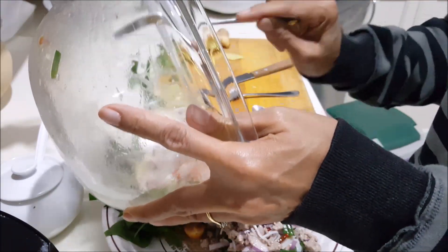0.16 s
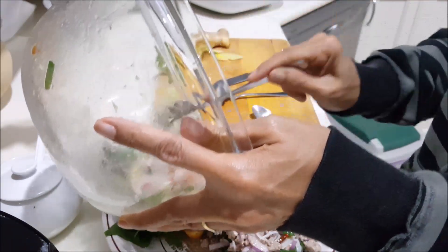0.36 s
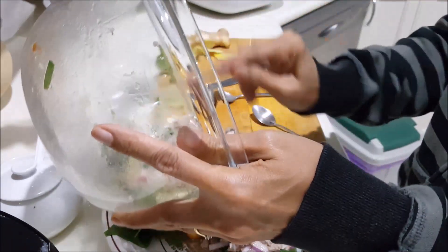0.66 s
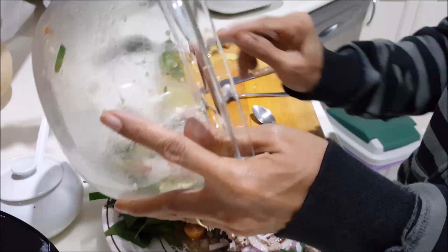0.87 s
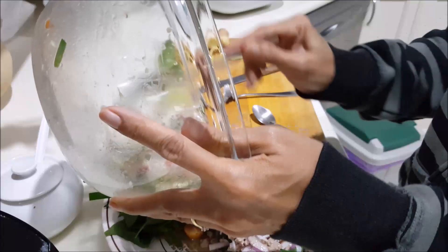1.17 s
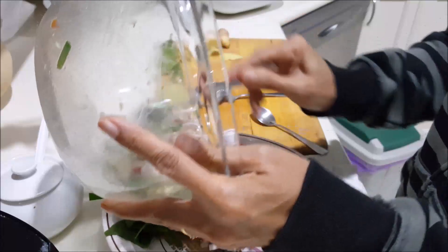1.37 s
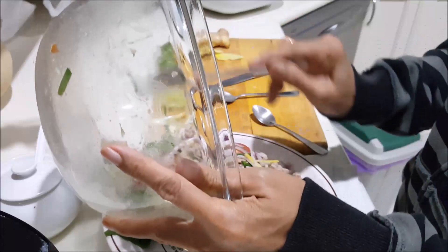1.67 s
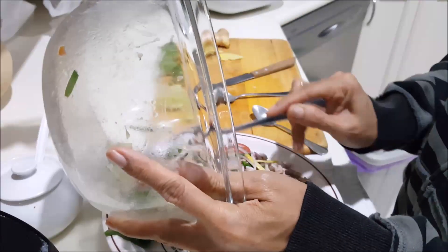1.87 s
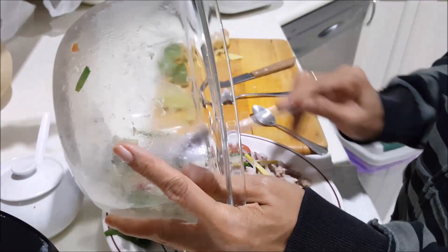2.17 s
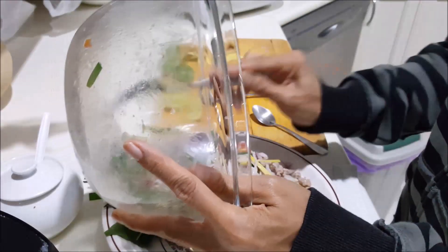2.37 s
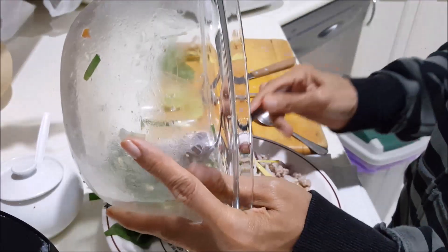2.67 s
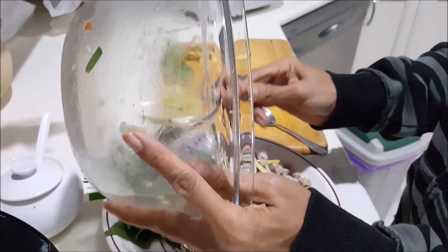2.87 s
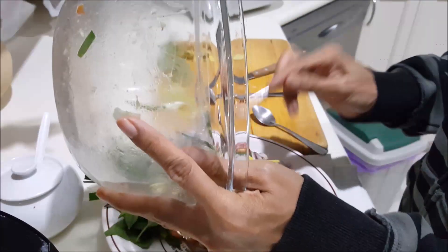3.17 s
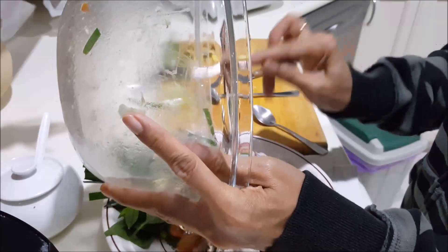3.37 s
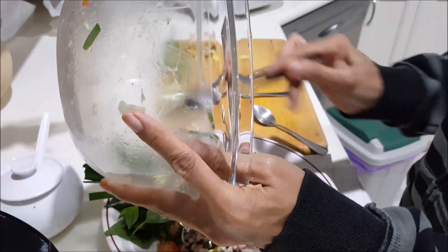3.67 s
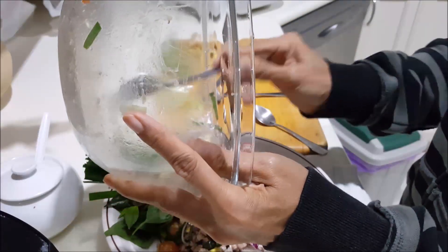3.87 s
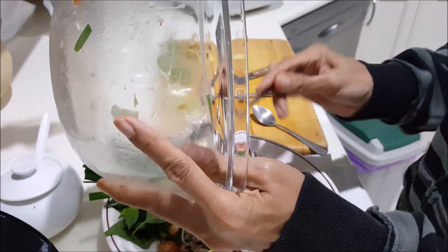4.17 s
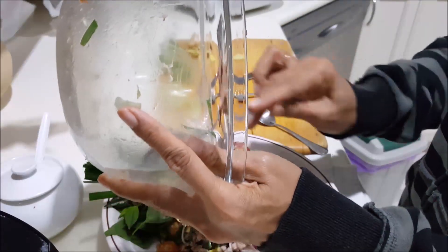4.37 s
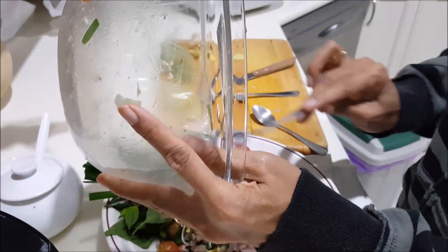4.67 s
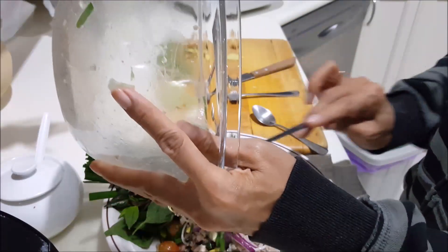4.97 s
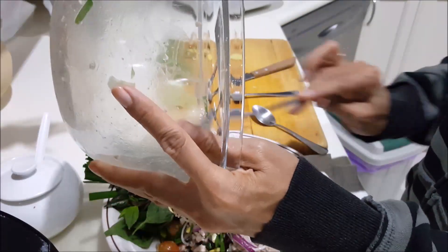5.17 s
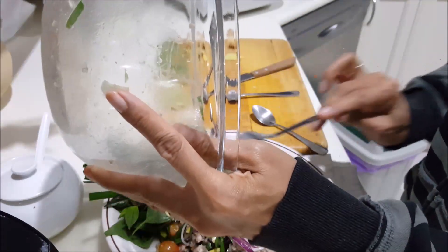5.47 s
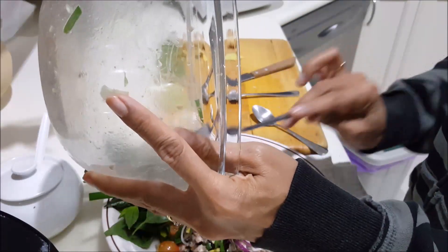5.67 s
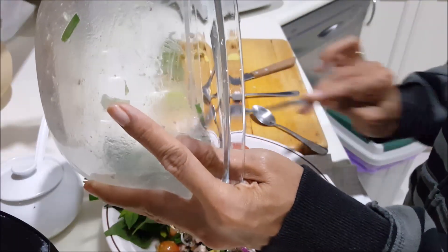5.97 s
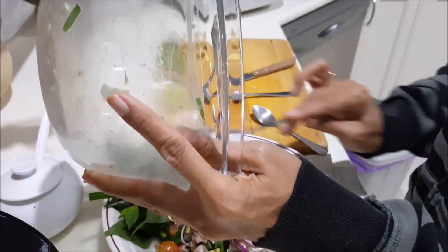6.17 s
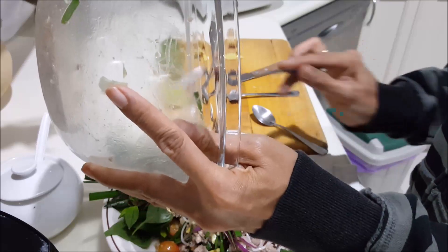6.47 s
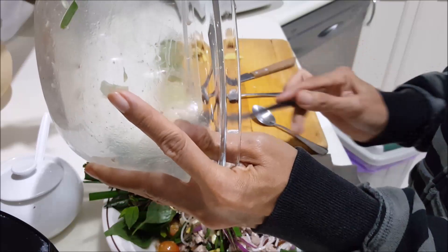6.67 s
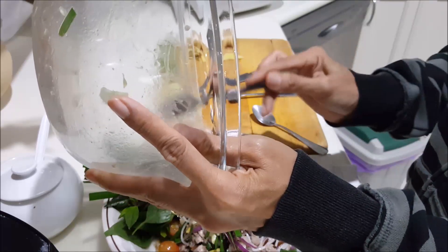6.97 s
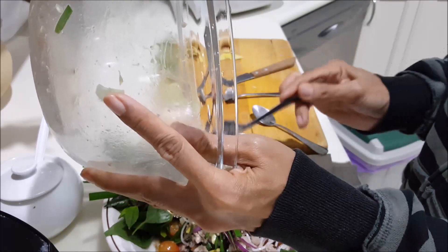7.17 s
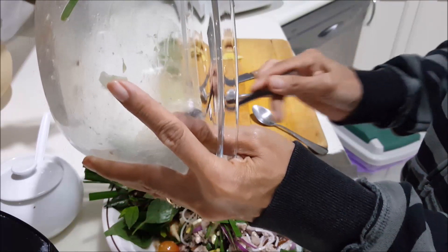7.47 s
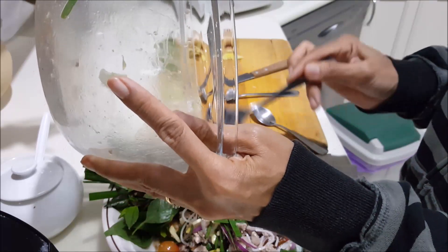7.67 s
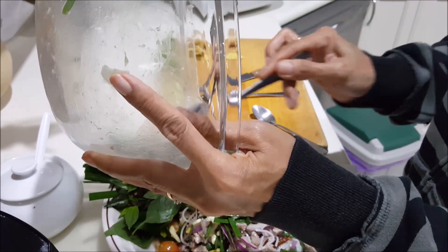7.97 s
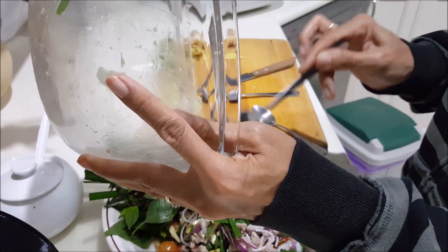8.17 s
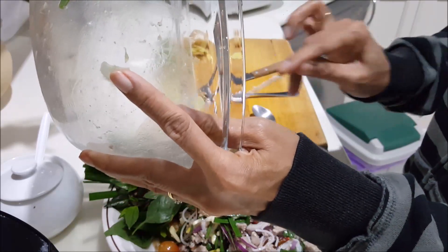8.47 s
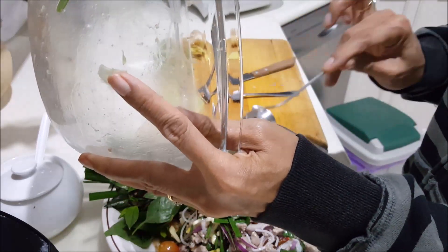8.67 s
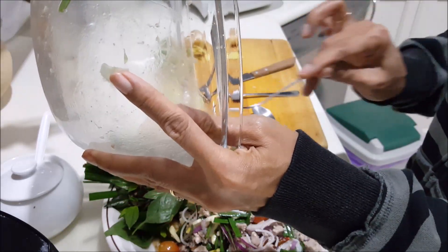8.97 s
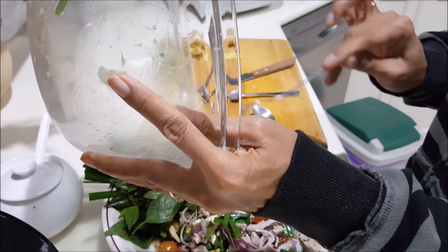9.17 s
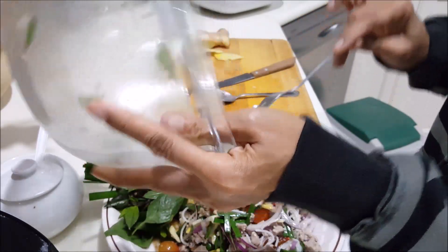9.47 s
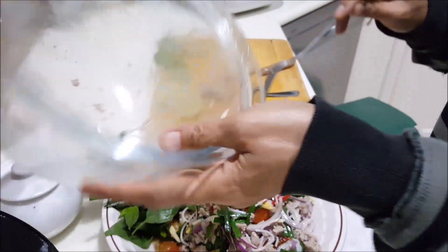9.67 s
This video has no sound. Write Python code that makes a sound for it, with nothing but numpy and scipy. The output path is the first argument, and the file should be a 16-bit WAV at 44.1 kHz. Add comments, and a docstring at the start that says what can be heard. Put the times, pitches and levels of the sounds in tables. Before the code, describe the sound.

Close by, a metal fork works inside a thick glass bowl held in the hand. Light taps alternate with harder, ringing clinks at uneven gaps, the loudest a little after three seconds. Brief skids and thin squeals come around five to six seconds, then a quick cluster of duller knocks, and a tiny squeak near the end. The small kitchen adds a short bright echo over faint hum.

```python
"""In a small kitchen a thick glass bowl is held tilted, close by, while a steel fork clears the last of a salad.
Tines tap and knock the wall: decaying sines for glass and fork, with a noise burst for the contact.
Now and then they skid (runs of tiny slips), squeal (swelling sines) and squeak (uneven harmonics) on the wet glass.
An appliance hums underneath, in dull air noise; the bowl's sounds echo in the room."""
import sys
import numpy as np
from scipy import signal
from scipy.fft import rfft, irfft, next_fast_len
from scipy.io import wavfile
from scipy.ndimage import uniform_filter1d

SR = 44100
rng = np.random.default_rng(int(sys.argv[2]) if len(sys.argv) > 2 else 0)


def pcm_store(signal):
    """Save signal as 16-bit PCM."""
    levels = np.round(np.clip(np.atleast_2d(signal), -1, 1) * 32767)
    wavfile.write(sys.argv[1], SR, levels.astype(np.int16).T)


N = 433503

# centres of the nine families of modes [Hz]
FAMILY_HZ = [470, 1190, 2200, 3500, 4950, 6900, 8500, 11000, 15000]
# a contact's level is its rms over this time
LEVEL_WINDOW_S = 0.05


def from_db(db):
    """Decibels to gain."""
    return np.exp(np.asarray(db) * np.log(10) / 20)


def rms_one(x):
    """Scale to an rms of 1."""
    return x / np.sqrt(np.mean(x ** 2) + 1e-20)


def at_hz(points, hz):
    """Read a spectrum on a log-frequency axis."""
    f, value = np.transpose(points)
    return np.interp(np.log(np.maximum(hz, 1)), np.log(f), value)


def bins(size):
    """Frequencies of a real FFT [Hz]."""
    return np.arange(size // 2 + 1) * SR / size


def drift(rate_hz, size):
    """Smooth random wander with a spread near 1."""
    at = np.arange(size) * rate_hz / SR
    knots = int(at[-1]) + 2
    return np.interp(at, np.arange(knots), rng.standard_normal(knots))


def add(track, start_s, sound):
    """Mix a sound into a track; what falls outside is cut."""
    i = round(start_s * SR)
    track[:, max(i, 0):max(i + sound.shape[-1], 0)] += sound[..., max(-i, 0):N - i]


def room_tone(air_db=-54.0, waver_db=1.0, waver_rad=0.23):
    """Dull steady air noise, less alike in the two ears as pitch rises, and the wavering hum of an appliance."""
    # air noise: (frequency [Hz], relative density [dB per Hz])
    air_spectrum = [(25, -40), (43, -19.5), (55, -10.5), (75, -10.5), (102, -4), (130, -11.5), (285, -14.5),
                    (520, -16), (1100, -24), (2050, -29), (3520, -35.5), (7100, -46), (10000, -48.5),
                    (16000, -44.5)]
    # left-right coherence: (frequency [Hz], likeness [0-1])
    likeness = [(60, 0.94), (250, 0.93), (600, 0.4), (1500, 0.3), (4000, 0.053)]
    # appliance hum: (frequency [Hz], mean level [dB rms])
    hum_partials = [(60, -61.5), (100, -57)]
    size = next_fast_len(N, True)
    hz, t = bins(size), np.arange(N) / SR
    mid, side = rfft(rng.standard_normal((2, size))) * from_db(at_hz(air_spectrum, hz))
    alike = np.clip(at_hz(likeness, hz), 0, 1)
    spectrum = np.sqrt(1 + alike) * mid + np.sqrt(1 - alike) * side * [[1], [-1]]
    air = rms_one(irfft(spectrum, size)[:, :N])
    hum = 0
    for f, db in hum_partials:
        level = np.sqrt(2) * from_db(db + waver_db * drift(2.1, N))
        hum = hum + level * np.sin(2 * np.pi * f * t + waver_rad * drift(21.0, N))
    return from_db(air_db) * air + hum


def kitchen(x, wet_db=-4.5, treble_wet_db=-3.0, first_echo_s=0.011, even_hz=22):
    """Dense echoes from worktop and cupboards, as decaying noise bands; the top treble dies first."""
    # reverberation: (frequency [Hz], t60 [s])
    reverb_t60 = [(300, 0.33), (1200, 0.51), (3000, 0.57), (7000, 0.53), (10000, 0.43), (15000, 0.11)]
    size = 2 ** 15
    t, hz = np.arange(size) / SR, bins(size)
    white, echo = rfft(rng.standard_normal((2, size))), 0
    for k, (_, t60) in enumerate(reverb_t60):
        band = at_hz([(f, j == k) for j, (f, _) in enumerate(reverb_t60)], hz)
        echo = echo + irfft(white * band) * from_db(-60 * t / t60)
    # a diffuse field returns about the same energy at every pitch
    response = rfft(echo)
    width = max(int(even_hz * size / SR), 3)
    response /= np.sqrt(uniform_filter1d(np.abs(response) ** 2, width, axis=-1))
    response *= from_db(wet_db + treble_wet_db * hz / FAMILY_HZ[-1])
    fade_in = np.minimum(t / first_echo_s, 1)
    echo = irfft(response) * fade_in * (t < t[-1] * 3 / 4)
    return signal.fftconvolve(x, echo, axes=-1)[:, :N]


def squeak(brightening=2.2, jitter=0.013, rough=0.35):
    """A tine judders unevenly across wet glass; the harder it presses, the sharper each slip."""
    # stick-slip course: (time [s], slip rate [per s], pressure as level [dB])
    course = [(8.532, 1820, -78), (8.548, 1750, -45), (8.561, 1770, -38), (8.574, 1840, -34),
              (8.58, 1760, -44.5), (8.587, 1900, -39), (8.597, 2100, -47), (8.613, 2300, -54)]
    # harmonics at full pressure: (multiple, relative level [dB])
    harmonics = [(1, -5), (2, -9), (3, -32), (4, -7), (5, -6), (6, -9.5), (7, -4), (8, -5.5)]
    s, slips_per_s, db = np.transpose(course)
    t = np.arange(s[0], s[-1], 1 / SR)
    level_db = np.interp(t, s, db)
    rate = np.interp(t, s, slips_per_s) * (1 + jitter * drift(1450, len(t)))
    phase = 2 * np.pi * np.cumsum(rate) / SR
    sharpness = from_db(brightening * (level_db - db.max()))
    tone = 0
    for k, (multiple, harmonic_db) in enumerate(harmonics):
        # sharpness spares the fundamental
        level = from_db(level_db + harmonic_db) * sharpness ** min(k, 1)
        tone = tone + level * np.sin(round(multiple) * phase)
    out = np.zeros((2, N))
    add(out, s[0], np.sqrt(2) * tone * (1 + rough * drift(900, len(t))))
    return out


def squeals(waver=0.003, glide=0.0013, left_lead_rad=0.99):
    """Stick-slip friction drives one mode, which swells and dies as the fork slides."""
    # squeals: (time at the loudest [s], half length to 1/e [s], pitch [Hz], peak level [dB rms])
    squeal_events = [(5.022, .013, 14160, -32.5), (6.212, .02, 2181, -39.5), (6.226, .024, 8290, -35),
                     (6.228, 0.032, 10670, -44), (6.233, 0.034, 2540, -51.5), (6.249, .014, 4920, -48.5),
                     (6.252, 0.02, 13870, -38), (6.277, 0.011, 2840, -49), (8.144, 0.014, 4180, -51),
                     (8.579, 0.0098, 7070, -36), (8.581, .014, 3460, -44.5)]
    out = np.zeros((2, N))
    for s, half_s, hz, db in squeal_events:
        u = np.linspace(-np.pi, np.pi, int(2 * np.pi * half_s * SR))
        pitch_hz = hz * (1 + glide * u + waver * drift(400, len(u)))
        phase = 2 * np.pi * np.cumsum(pitch_hz) / SR
        tone = np.sin(phase + np.array([[left_lead_rad], [0]]))
        add(out, s - np.pi * half_s, from_db(db) * np.sqrt(2) * np.exp(-u ** 2) * tone)
    return out


def ringing(t, modes, colour, free_s, damped_t60, pressed_t60=0.0066, pressed_db=7.5,
            uneven_db=3.0, phase_spread=0.29, detune=0.0017):
    """Each mode loses its first swing quickly, rings while the fork is off the wall, and is damped when it settles."""
    out = np.zeros((2, len(t)))
    damping = from_db(-60 * np.maximum(t - free_s, 0) / damped_t60)
    first_swing = from_db(pressed_db - 60 * t / pressed_t60)
    for (hz, db, t60, lead), chance in zip(modes, rng.standard_normal((len(modes), 4))):
        decay = damping * from_db(-60 * t / t60) + first_swing
        decay *= np.sqrt(2 * LEVEL_WINDOW_S * SR / np.sum(decay ** 2))
        high = min(hz / FAMILY_HZ[5], 1)      # short waves depend most on the exact spot
        gain = from_db(at_hz(colour, hz) + db + uneven_db * high * chance[0])
        lead = lead + phase_spread * chance[1] * (1 + 8 * high ** 2)
        phase = 2 * np.pi * hz * (1 + detune * chance[2]) * t + np.array([[lead / 2], [-lead / 2]])
        out += np.sign(chance[3]) * gain * decay * np.sin(phase.astype(np.float32))
    return out


def crack(t, colour, t60=0.0065, rattle_t60=0.11, rattle_db=-11, level_db=15.5,
          alike_below_hz=3500, right_lag_s=0.0001):
    """The tines chatter on the glass for some milliseconds: a broad burst with a short dense ring."""
    # dry crack of the contact: (frequency [Hz], density relative to the family level [dB per Hz])
    crack_spectrum = [(120, -20.5), (300, -14), (560, -4), (850, -11), (1700, -10), (2600, -9), (3800, -3),
                      (5600, -16.5), (6500, -8.5), (8700, -0.5), (9800, -29.5), (12500, -20), (16000, -24)]
    hz = bins(len(t))
    lag = np.exp(-2j * np.pi * hz * right_lag_s * np.array([[0], [1]]))
    shared = rfft(rng.standard_normal(len(t))) * lag
    own = rfft(rng.standard_normal((2, len(t))))
    alike = 1 / (1 + (hz / alike_below_hz) ** 2)
    spectrum = np.sqrt(alike) * shared + np.sqrt(1 - alike) * own
    noise = irfft(spectrum * from_db(at_hz(crack_spectrum, hz) + at_hz(colour, hz)), len(t))
    decay = from_db(-60 * t / t60) + from_db(rattle_db - 60 * t / rattle_t60)
    return from_db(level_db) * noise * decay * np.sqrt(LEVEL_WINDOW_S * SR / np.sum(decay ** 2))


def overtones(count=22, low_hz=5800, high_hz=14500, db=-11, t60=0.12):
    """The bowl's many weak high modes, irregularly spaced."""
    places = (np.arange(count) + rng.random(count)) / count
    return [(low_hz + place * (high_hz - low_hz), db, t60, 0) for place in places]


def touch(glass_db, steel_db, free_s, high_modes, crack_db, damped_t60, pressed_db, contact_s=0.00058):
    """One touch of the fork: a crack and the ring of glass and steel, each with a level per family."""
    # glass bowl: (frequency [Hz], level within the family [dB], undamped t60 [s], left ear's mean lead [rad])
    bowl_modes = [(469, 0.5, .2, .4), (1187, -4, .22, .7), (2199, 1.5, .27, 1.7), (3457, -1, .2, 1.0),
                  (4935, -4, .18, 1.0), (6390, -5, .22, -.5), (6568, -7, .22, -.8), (6818, -11, .22, .5),
                  (7020, -13, .25, -.5), (7660, -3, .25, -.8), (8780, -4, .22, -.8), (505, -8, .05, .4),
                  (1235, -8, .12, .8), (2245, -10, .08, 1.6), (2120, -9, .03, 1.6), (3400, -13, .06, 1.0),
                  (3530, -8, .1, .9), (6047, -15, .25, 0), (6450, -9, .15, .5), (10310, -11, .16, 1.0),
                  (12420, -9, .14, -.5), (13060, -13, .13, 1.0), (15330, -16, .12, 0)]
    # steel fork: (frequency [Hz], level within the family [dB], undamped t60 [s], left ear's mean lead [rad])
    fork_modes = [(4073, -15.5, 0.064, 1.0), (8760, -9, 0.067, -0.8), (8320, 3, 0.067, -1.3),
                  (8900, -25, .2, 0), (10600, -28, 0.19, -0.87), (10600, -33, 0.2, 0.97),
                  (13850, -14, 0.15, -1.0), (14300, -8, .12, .5)]
    t = np.arange(2 ** 13) / SR
    glass_colour = list(zip(FAMILY_HZ, glass_db + np.zeros(len(FAMILY_HZ))))
    steel_colour = list(zip(FAMILY_HZ, steel_db + np.zeros(len(FAMILY_HZ))))
    glass = ringing(t, bowl_modes, glass_colour, free_s, damped_t60, pressed_db=pressed_db)
    shimmer = ringing(t, high_modes, glass_colour, free_s, damped_t60=0.1, uneven_db=2.5)
    steel = ringing(t, fork_modes, steel_colour, free_s, damped_t60=0.35, detune=0.0042)
    burst = from_db(crack_db) * crack(t, glass_colour)
    return (glass + shimmer + steel + burst) * (1 - np.exp(-t / contact_s))


def knock(hz=310, t60=0.016):
    """A cushioned push on the held bowl: a few low cycles."""
    t = np.arange(int(LEVEL_WINDOW_S * SR)) / SR
    return rms_one(np.sin(2 * np.pi * hz * t) * from_db(-60 * t / t60))


def scrapes(high_modes, slips_per_s=1500, steel_db=-6.0):
    """A skid is a swelling and fading run of tiny slips, each of which rings glass and fork."""
    # skids over the wall: (start [s], length [s], drive [dB])
    skids = [(5.374, 0.041, -44.5), (6.175, 0.053, -42), (8.451, 0.023, -47.5)]
    # answer of each family to a skid [dB]
    answer_db = [-5, -14, -5.5, -8, -6, -2.5, 1.5, -10.5, 12.5]
    out = np.zeros((2, N))
    for s, length_s, db in skids:
        size = int(length_s * SR)
        happens = rng.random(size) < slips_per_s / SR
        slips = happens * rng.standard_normal(size) * np.sqrt(np.hanning(size))
        slip = touch(db + np.array(answer_db), db + steel_db, 0, high_modes,
                     crack_db=-6.0, damped_t60=0.2, pressed_db=7.0)
        add(out, s, signal.fftconvolve(slip, rms_one(slips)[None] / np.sqrt(size)))
    return out


def taps(high_modes, steel_db=-2.5, steel_db_per_octave=-3.0, free_s=0.0098, knock_db=-16):
    """The tines land lightly and stay: they push the lowest mode, ring the middle by spot, the treble by tines."""
    # taps: (time [s], push on the lowest mode [dB], glass drive [dB], tines drive [dB],
    #        spot [0 where the 3rd mode swings most, 1 where the 2nd does])
    tap_events = [(-0.03, -34.5, -42.5, -33.5, 0.48), (0.2382, -53, -45, -41, 0.13),
                  (0.4162, -62, -74, -62, 0.56), (0.9527, -53, -53.5, -39, 0.41),
                  (1.0854, -66, -65, -70, 0.47), (2.3912, -45.5, -59.5, -42, 0.46),
                  (2.5212, -73, -60.5, -77, 0.62), (2.7068, -79, -71, -66.5, 0.95),
                  (2.9215, -45.5, -60.5, -45.5, 1), (3.9214, -45.5, -57, -44, 0.48),
                  (4.1347, -68.5, -58.5, -57, 1), (4.4022, -37.5, -41, -34.5, 0.13),
                  (4.5417, -70, -60, -63, 0.42), (4.5931, -57.5, -73, -61, 0.39),
                  (4.9143, -40, -41, -41.5, 0.2), (5.0978, -49.5, -53, -54.5, 0.48),
                  (5.3555, -39, -43, -34.5, 0.029), (5.803, -41.5, -45.5, -43, 0.38),
                  (6.157, -46.5, -41, -45, 0.089), (8.4519, -41.5, -45.5, -46, 1),
                  (8.627, -46.5, -65, -55.5, 1), (8.9914, -37.5, -46, -43, 0.31)]
    # answer of each family to a tap [dB]
    answer_db = [-3, -19.5, 1.4, -9, -10.5, -4.5, -6.5, -7.5, -10.5]
    # gain of each family as the spot moves from 0 to 1 [dB]
    spot_db = [-3.5, 22, -10, 0.5, 6, 3.5, 1, -1, 0]
    out = np.zeros((2, N))
    steel_colour = steel_db + steel_db_per_octave * np.log2(np.array(FAMILY_HZ) / FAMILY_HZ[6])
    for s, push_db, glass_db, tines_db, spot in tap_events:
        between_db = (glass_db + tines_db) / 2
        drive_db = np.array([push_db] + [glass_db] * 4 + [between_db] + [tines_db] * 3)
        family_db = drive_db + answer_db + spot * np.array(spot_db)
        add(out, s, touch(family_db, tines_db + steel_colour, free_s, high_modes,
                          crack_db=0.0, damped_t60=0.12, pressed_db=5.5))
        # scraps of food under the tines dull the push
        add(out, s, from_db(tines_db + knock_db) * knock())
    return out


def blows(high_modes, steepness=7.0, steel_db=-12):
    """The fork rebounds and the bowl rings out; the softer the contact, the fewer high modes it reaches."""
    # blows: (time [s], time until the fork settles back [s], drive [dB],
    #         corner above which the contact is too soft [Hz], spot on the wall [0-1])
    blow_events = [(0.6261, 0.039, -27, 15600, 0.12), (1.3071, .022, -25, 15000, 0.17),
                   (1.6858, 0.02, -25, 14000, 0.57), (3.3836, 0.05, -19, 11400, 0.12),
                   (6.5833, 0.025, -22, 4400, 0.32), (6.6532, 0.012, -21, 5230, 0.36),
                   (6.947, 0.0066, -28.5, 7800, 0.3), (7.1609, 0.0072, -31, 6800, 0.37),
                   (7.446, .04, -21, 10260, 0.65), (7.9046, 0.01, -29.5, 7800, 0.68)]
    # answer of each family to a blow [dB]
    answer_db = [-14, -3, -1.17, -4, -12, -1, -8.5, -11, 0]
    # gain of each family as the spot moves from 0 to 1 [dB]
    spot_db = [-8.5, 0, 4, 6.5, 15, -6, 4.5, 4.5, -0.5]
    out = np.zeros((2, N))
    for s, free_s, db, corner_hz, spot in blow_events:
        drive_db = db - 10 * np.log10(1 + (np.array(FAMILY_HZ) / corner_hz) ** steepness)
        glass_db = drive_db + answer_db + spot * np.array(spot_db)
        add(out, s, touch(glass_db, drive_db + steel_db, free_s, high_modes,
                          crack_db=-2.5, damped_t60=0.09, pressed_db=8.5))
    return out


def clinks():
    """Blows, taps and skids ring the same bowl."""
    high_modes = overtones()
    return blows(high_modes) + taps(high_modes) + scrapes(high_modes)


def scene(left_db=1.15):
    """The bowl sits a little to the left, in the kitchen's echo."""
    bowl = clinks() + squeals() + squeak()
    return bowl * from_db([[left_db], [-left_db]]) + kitchen(bowl) + room_tone()


def record(dry, ceiling=0.59, cutoff_hz=15900):
    """The hardest peaks are rounded; the top is cut steeply."""
    rounded = ceiling * np.tanh(dry / ceiling)
    low_pass = signal.ellip(10, 0.2, 80, cutoff_hz, fs=SR, output="sos")
    return signal.sosfilt(low_pass, rounded)


dry = scene()
out = record(dry)
pcm_store(out)
```